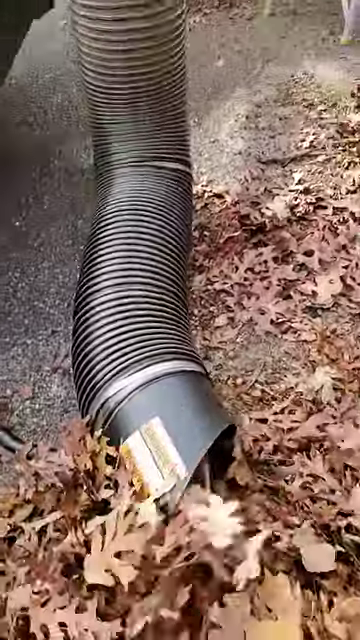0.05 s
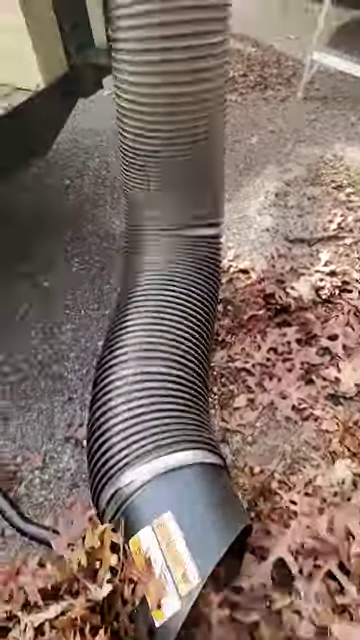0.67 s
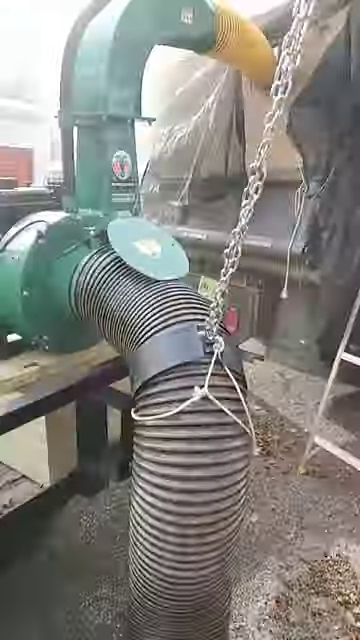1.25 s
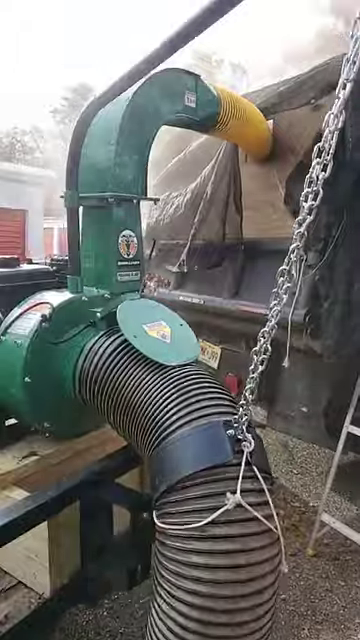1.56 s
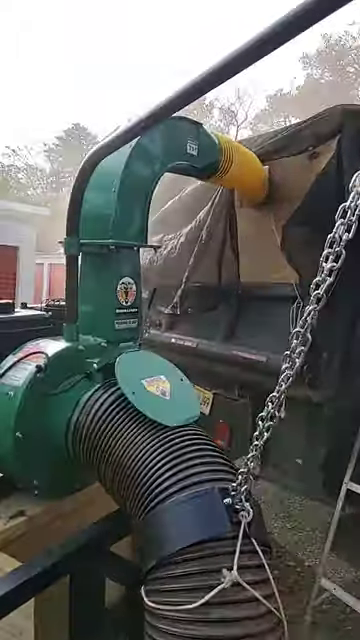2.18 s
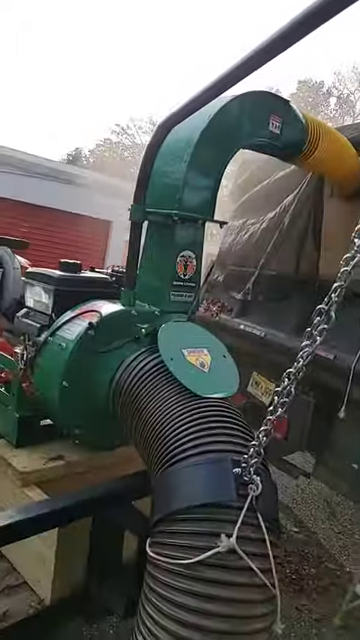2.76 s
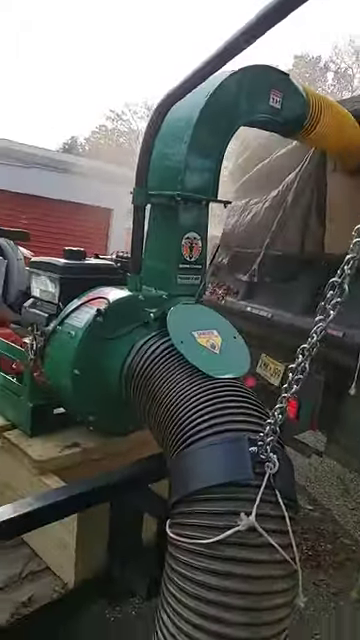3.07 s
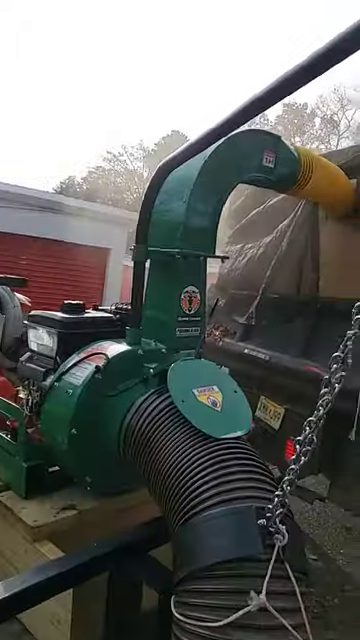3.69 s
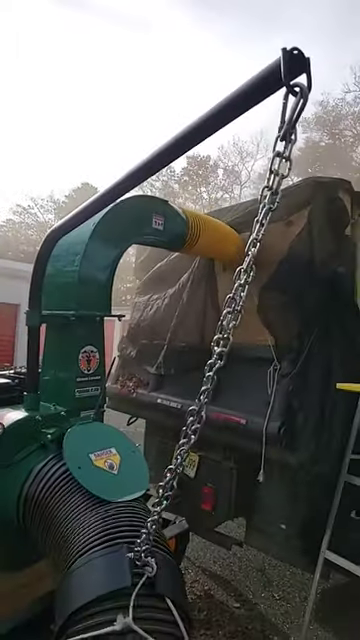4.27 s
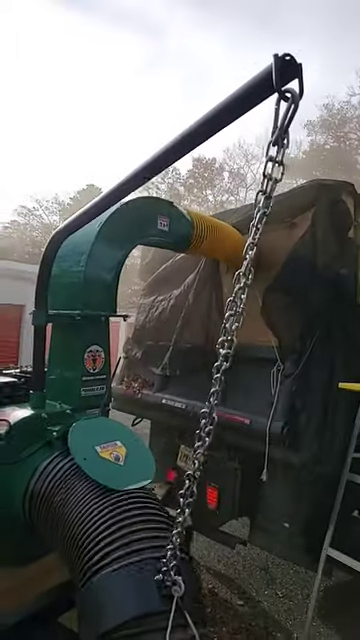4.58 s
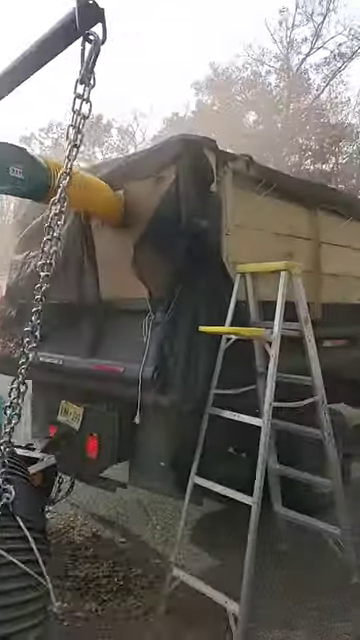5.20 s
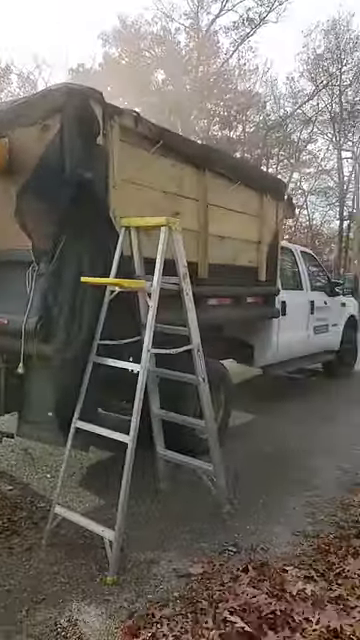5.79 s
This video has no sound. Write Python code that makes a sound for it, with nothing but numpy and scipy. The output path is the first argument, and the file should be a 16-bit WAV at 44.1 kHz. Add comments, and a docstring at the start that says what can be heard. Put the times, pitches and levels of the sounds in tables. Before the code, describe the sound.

An engine-driven leaf vacuum runs loudly outdoors for about six seconds, heard from a step or two away. Its fan holds a strong, low drone over a thumping, clattering engine and rumbling air. Leaves crackle constantly through the steel housing, and twigs and grit clack against it irregularly. At first dry leaves also rustle into the humming hose mouth, fading by about 1.5 seconds as the microphone moves along. At 1.2 seconds a big wad crunches through with a slight metallic ring; the pitch sags and recovers by about 2 seconds. Beside the machine the drone grows buzzier, with sharper clacks near 1.8 and 2.8 seconds. Between 4 and 4.7 seconds the drone dips twice, and more leaves lower the pitch slightly. Another sharp clack comes near 5 seconds, and the rumble and engine clatter grow a little toward the end.

```python
"""A truck loader's four-blade impeller drones at blade rate as it vacuums dry leaves through a ribbed hose.
A governed four-stroke engine spins it, thumping and clattering over rushing air. Leaves crackle through
the steel housing, twigs and grit clack against it, and one big wad bogs the engine down.
The listener walks outdoors, a step or two away, from the hose mouth past the housing to the truck box."""
import sys
import numpy as np
from scipy import signal
from scipy.fft import rfft, irfft
from scipy.io import wavfile

SR = 44100
rng = np.random.default_rng(int(sys.argv[2]) if len(sys.argv) > 2 else 0)


def generate_wav(signal):
    """Clip the signal to [-1, 1] and save it as 16-bit WAV at the path in sys.argv[1]."""
    frames = np.transpose(np.atleast_2d(signal))
    scaled = np.clip(frames, -1, 1) * 32767
    pcm = np.round(scaled).astype(np.int16)
    wavfile.write(sys.argv[1], SR, pcm)


N = 257984
TIME = np.arange(N) / SR
SIDES = np.array([[1], [-1]])  # left, right


# blade drone along the walk: t/s, relative level/dB
DRONE_FADER = [(0, -10), (.35, -10.5), (1.25, -15), (1.6, -16), (1.92, -9.5), (2.5, -11), (3.6, -13),
               (5.85, -12)]
# brief dips in the drone: start/s, end/s, depth/dB
DRONE_DUCKS = [(0.352, 0.437, 7), (0.547, .72, 1.8), (1.313, 1.538, 5), (4.01, 4.364, 9),
               (4.488, 4.664, 5.5), (4.9, 5.22, 2)]

def impeller(turns, octave_db):
    """Four blades pass the housing's tongue: a strong drone and its octave, reaching the right first."""
    dips_db = sum(db * spell(start, end, attack_s=.12, release_s=.11) for start, end, db in DRONE_DUCKS)
    drone_db = curves(DRONE_FADER)[0] + 3.5 - dips_db
    pan_db = -3 - 9 * bell(4.27, width_s=.055)  # the left side passes through a quiet spot
    blade_phase = 2 * np.pi * 4 * turns
    lag_rad = np.interp(TIME, [0, 2.7], [.3, 1.05])
    drone = np.sin(blade_phase - SIDES * lag_rad / 2 + .1 * drift(40)) * undb(drone_db + .36 * drift(30))
    octave = np.sin(2 * blade_phase - SIDES * .12 + .066 * drift(25))
    octave *= undb(octave_db + 1 + .74 * drift(15))
    return drone * pan(pan_db) + octave * pan(-3.5)


# leaves drawn in, adding up where they overlap: start/s, end/s, drag on the shaft/Hz
LEAF_FEEDS = [(-1, 1.2, .95), (.62, 1.2, .55), (4.26, 6, 1.0), (4.28, 4.55, 2.2), (4.79, 4.97, 1.4)]
FREE_SHAFT_HZ, GOVERNOR_LAG_S = 59.02, .29
WAD_START_S, WAD_END_S, WAD_DRAG_HZ = 1.218, 1.375, 9.3

def shaft_sag():
    """Turns per second lost to the leaves; flywheel and governor follow the drag with a lag."""
    feeds = sum(hz * spell(start, end, attack_s=.051, release_s=.051) for start, end, hz in LEAF_FEEDS)
    drag = feeds + WAD_DRAG_HZ * wad_passing()
    keep = np.exp(-1 / (GOVERNOR_LAG_S * SR))
    return drag[0] + signal.lfilter([1 - keep], [1, -keep], drag - drag[0])


def wad_passing():
    """How much of the big wad of leaves is among the blades, 0-1."""
    return spell(WAD_START_S, WAD_END_S, attack_s=.05023, release_s=.09)


# engine tones, with halves from firing every second turn: multiple of shaft speed, relative level/dB
ENGINE_TONES = [(1, -24.5), (1.5, -33), (2, -18), (2.5, -18), (3, -15), (3.5, -17.5), (4.5, -23),
                (5, -21.5), (5.5, -36), (6, -22), (6.5, -27), (7.5, -31), (8.5, -22), (9, -31), (9.5, -52),
                (10, -19.5), (10.5, -34), (11, -22.5), (13, -25.5), (13.5, -38.5), (16, -28.5),
                (17.5, -31.5), (22, -39), (22.5, -33), (24, -36)]

def engine(turns, thump_db, overtone_db):
    """Each firing is a thump of uneven strength, smeared by the muffler; block and shroud add overtones."""
    firing_db = 2 * drift(29)
    tones = 0
    for multiple, db in ENGINE_TONES:
        layer_db = thump_db + 14 + firing_db if multiple < 7 else overtone_db + 13 + 2 * drift(1.47)
        if multiple == 2:  # this tone booms briefly
            layer_db += 10 * bell(5.52, width_s=.07)
        smear = .2 * (multiple - 4) ** 2  # the muffler delays each tone differently
        waver = (.28 + .0058 * multiple) * drift(22)  # uneven firing blurs the high tones most
        phase = 2 * np.pi * multiple * turns + smear + waver
        tones -= np.sin(phase - SIDES * .21) * undb(db + layer_db + 1.67 * drift(14))
    return tones * pan(-1.3)


# knock rhythm: place in the engine cycle/0-1, relative level/dB
VALVE_KNOCKS = [(.02, -15), (0.359, -21), (0.609, -21), (0.751, -22)]
# boxy clatter: f/Hz, relative level/dB
CLATTER_EQ = [(200, -3.5), (400, 2), (560, 0), (760, -3), (900, -8.5), (1150, -8.5), (1300, -11.5),
              (1600, -12.5), (3000, -16.5), (8000, -32.5)]

def valves(turns, clatter_db):
    """Valve gear and exhaust gas clatter in a pattern that repeats every second turn."""
    knocks = sum(undb(db) * np.exp(-((turns / 2 - place) % 1) / .085) for place, db in VALVE_KNOCKS)
    gate = unit(.42 + knocks * undb(3.9 * drift(60)))
    return colour(stereo_noise(.54) * gate, CLATTER_EQ) * undb(clatter_db + 1) * pan(-2)


# larger twigs hitting the housing: t/s, relative peak level/dB, t60/s
TWIG_HITS = [(0.096, -20.5, 0.089), (0.3565, -18, 0.051), (0.631, -22.5, 0.15), (0.7921, -22.5, 0.14),
             (0.823, -21.5, 0.18), (0.844, -20.5, 0.08), (0.9682, -21, 0.2), (1.2173, -13.5, 0.18),
             (1.257, -16, 0.079), (1.353, -14.5, 0.1), (1.4707, -15, 0.12), (1.515, -16, 0.089),
             (1.8068, -15, 0.067), (1.825, -13, 0.14), (1.9605, -17.5, 0.17), (2.3875, -17.5, 0.069),
             (2.7751, -22, 0.1), (2.8479, -10, 0.072), (3.091, -23, 0.25), (3.1308, -22, 0.093),
             (3.362, -21.5, 0.069), (3.685, -23, 0.14), (3.864, -20, 0.11), (4.0246, -19.5, 0.11),
             (4.384, -18, 0.24), (4.475, -16, 0.25), (4.859, -18, 0.13), (4.9656, -11.5, 0.052),
             (5.4615, -23.5, 0.58), (5.66, -18, 0.17)]
# midrange body of shredding and clacks: f/Hz, relative level/dB
SHRED_EQ = [(250, -5), (600, 2), (1000, -2.5), (1300, -1), (1700, -1.5), (2300, -3), (3500, -11.5),
            (8000, -9)]
GRIT_PER_S = 3

def debris(sag_hz, shred_db):
    """Leaves crackle all the time, more under load; twigs and grit crack and trail off in fragments."""
    crackle_db = -27.5 + 1.5 * np.log2(1 + sag_hz)
    fine = grains(per_s=900, spread_db=2, t60_s=.05)
    coarse = grains(per_s=70, spread_db=2, t60_s=.13)
    patter = unit(fine + .6 * coarse)
    wad = undb(-15) * wad_passing() * grains(per_s=900, spread_db=1.3, t60_s=.05)
    crack_power = (patter * undb(crackle_db)) ** 2 + wad ** 2
    clack_power = (patter * undb(shred_db)) ** 2 + (wad * undb(-6)) ** 2
    grit = [(s, -28.5, .1) for s in rng.uniform(0, N / SR, int(GRIT_PER_S * N / SR))]
    for s, db, t60_s in TWIG_HITS + grit:
        age = np.maximum(TIME - s, 0)
        blow = (TIME >= s) * undb(db + 1.47 - 60 * age / t60_s)
        crack_power += blow ** 2
        clack_power += (blow * undb(-6.5)) ** 2
    splinters = grains(per_s=8400, spread_db=-2.7, t60_s=.012)
    pelting = stereo_noise(.092) * np.sqrt(clack_power) * splinters
    crackle = leaf_crackle(np.sqrt(crack_power) * splinters)
    return crackle + colour(pelting, SHRED_EQ) + housing(pelting) * undb(-14.5) + wad_clang()


# crisp leaf crackle: f/Hz, relative level/dB
CRACKLE_EQ = [(600, -30), (1500, -13.5), (2600, 0), (3600, -4), (4400, 0.5), (5600, -4), (7000, -5),
              (8600, -14.5), (10000, -7), (11000, 0), (13500, -2), (15500, -0.5)]
# its stereo image: f/Hz, left minus right/dB
CRACKLE_IMAGE = [(1500, 0), (2400, -2.5), (3800, 1), (4500, 0), (5500, 2), (7000, -.5), (11000, 0),
                 (12500, 3), (13500, 5.5), (15500, 6.5)]
# its sizzle above about 10 kHz along the walk: t/s, relative level/dB
SIZZLE_FADER = [(0, -1), (.9, 3.5), (1.4, -3), (2.5, -2), (4, -2), (5, -2), (5.85, 1)]

def leaf_crackle(envelope):
    """Bright crackle of breaking leaves; its top octave depends on where the listener stands."""
    crackle = colour(stereo_noise(.027) * envelope, CRACKLE_EQ)
    spectrum = rfft(crackle) * response(CRACKLE_IMAGE) ** (SIDES / 2)
    sizzle = irfft(spectrum * response([(7000, -14), (10500, 2.5)]), N)
    return irfft(spectrum, N) + sizzle * (undb(curves(SIZZLE_FADER)[0]) - 1)


# ring of the steel housing: f/Hz, t60/s, relative level/dB
STEEL_MODES = [(1300, .12, -2), (1345, .08, -7), (2480, .03, -8), (3236, .04, -10), (4044, .04, -11),
               (4350, .03, -11)]

def housing(pelting):
    """The steel shell rings in its modes when pelted."""
    ring = 0
    for hz, t60_s, db in STEEL_MODES:
        pole = np.exp((2j * np.pi * hz - np.log(1000) / t60_s) / SR)
        ring += undb(db) * np.sqrt(1 - abs(pole) ** 2) * signal.lfilter([1], [1, -pole], pelting).imag
    return ring


def wad_clang():
    """The wad's first blow sets the housing's lowest mode ringing."""
    age = np.maximum(TIME - WAD_START_S, 0)
    return undb(-26) * np.sin(2 * np.pi * STEEL_MODES[0][0] * age) * np.exp(-age / .1)


def hose_mouth(turns):
    """Dry leaves rustle in and the hose hums on two engine tones; all fade as the listener turns away."""
    rustle_db = np.interp(TIME, [0, .85, 1.15, 1.7], [-32, -28.5, -31.5, -58])
    rustle_eq = [(1500, -17), (2400, -5), (2900, -2.5), (3500, -4), (5000, -11.5), (8000, -11)]
    rustle = colour(stereo_noise(.092) * grains(per_s=270, spread_db=2.5, t60_s=.16), rustle_eq)
    hum_db = np.interp(TIME, [.7, 1.2], [-32, -60])
    low_hum = np.sin(2 * np.pi * 7.5 * turns) * undb(2 * drift(4.4))
    high_hum = np.sin(2 * np.pi * 13 * turns) * undb(-9.5 + 2 * drift(2.4))
    return rustle * undb(rustle_db) + (low_hum + high_hum) * undb(hum_db)


# deep air rumble: f/Hz, relative level/dB
RUMBLE_EQ = [(20, -25), (38, -32), (55, 6), (85, 1), (115, 2), (150, -8.5), (300, -37)]
# the rumble along the walk: t/s, level/dB
RUMBLE_FADER = [(0, -29), (.9, -29), (1.5, -32), (2.1, -31), (3, -34), (4.3, -34), (4.8, -30.5),
                (5.4, -27.5), (5.85, -26)]
# dark bed of rushing air: f/Hz, relative level/dB
RUSH_EQ = [(70, -26.5), (130, -5.5), (200, 1), (300, -2.5), (450, -6), (700, -17.5), (1500, -36.5)]

def airflow():
    """Turbulent air rushes through the housing and rumbles most by the hose mouth and the truck box."""
    rumble = colour(stereo_noise(1), RUMBLE_EQ) * undb(curves(RUMBLE_FADER)[0] + drift(9.7))
    rush = colour(stereo_noise(.92), RUSH_EQ) * undb(-27.5 + drift(7.5))
    return (rumble + rush) * pan(-2.6)


def grains(per_s, spread_db, t60_s):
    """Envelope of fragments striking at random and dying away; a negative spread makes some softer."""
    strength = undb(spread_db * np.minimum(rng.exponential(size=N), 4))
    strike_power = (rng.random(N) < per_s / SR) * strength ** 2
    keep = np.exp(-2 * np.log(1000) / (t60_s * SR))
    return unit(np.sqrt(signal.lfilter([1], [1, -keep], strike_power)))


def stereo_noise(likeness):
    """Left and right noise with a shared part, 0-1, that reaches the left a little later."""
    shared = rng.standard_normal(N)
    staggered = np.array([np.roll(shared, 5), shared])
    return np.sqrt(likeness) * staggered + np.sqrt(1 - likeness) * rng.standard_normal((2, N))


def colour(x, eq):
    """Minimum-phase EQ; white noise keeps its power."""
    cepstrum = irfft(np.log(unit(response(eq))), N)
    cepstrum[1:N // 2] *= 2
    cepstrum[N // 2 + 1:] = 0
    return irfft(rfft(x) * np.exp(rfft(cepstrum)), N)


def response(eq):
    """Gain at each spectral bin from points of f/Hz, level/dB."""
    hz, db = np.transpose(eq)
    bin_hz = np.arange(N // 2 + 1) * SR / N
    return undb(np.interp(np.log(bin_hz + 1), np.log(hz), db))


def drift(per_s):
    """Random wobble of rms 1, changing per_s times a second."""
    steps = rng.standard_normal(4096)
    return unit(np.interp(TIME * per_s, np.arange(len(steps)), steps))


def spell(start_s, end_s, attack_s, release_s):
    """Envelope that rises from its start, holds at up to 1 and falls after its end."""
    rise = (TIME - start_s) / attack_s
    fall = 1 - (TIME - end_s) / release_s
    return np.clip(np.minimum(rise, fall), 0, 1)


def bell(s, width_s):
    """Smooth swell that reaches 1 at the given time."""
    return np.exp(-((TIME - s) / width_s) ** 2)


def curves(table):
    """Each column of a timed table, sample by sample."""
    s, *columns = np.transpose(table)
    return [np.interp(TIME, s, column) for column in columns]


def pan(db):
    """Left and right gains for a level difference; negative leans right."""
    return undb(SIDES * db / 2)


def undb(db):
    """Decibels to gain."""
    return 10 ** (np.asarray(db) / 20)


def unit(x):
    """Scale to rms 1."""
    return x / np.sqrt(np.mean(x ** 2))


# relative levels along the walk: t/s, blade octave/dB, engine thump/dB, valve clatter/dB, shredding/dB
MACHINE_FADERS = [(0, -57, -28.5, -30, -34.5), (.7, -45, -30.5, -31.5, -36),
                  (1.05, -30.5, -27.5, -28, -34.5), (1.6, -31, -28, -27, -29),
                  (2.3, -24, -25.5, -27.5, -30), (4.25, -23.5, -24.5, -28, -30.5),
                  (4.65, -29, -28, -26.5, -29.5), (5.3, -28.5, -25.5, -24, -29),
                  (5.85, -26.5, -25, -25, -33)]

def scene():
    """One shaft drives the engine and the impeller; air rushes through and leaves slow it."""
    sag_hz = shaft_sag()
    turns = np.cumsum(FREE_SHAFT_HZ - sag_hz) / SR
    octave_db, thump_db, clatter_db, shred_db = curves(MACHINE_FADERS)
    overtone_db = (octave_db + clatter_db) / 2  # overtones come through best beside the machine
    machine = impeller(turns, octave_db) + engine(turns, thump_db, overtone_db) + valves(turns, clatter_db)
    return machine + airflow() + debris(sag_hz, shred_db) + hose_mouth(turns)


def record(dry):
    """Clip at full scale, then cut the treble steeply above 15.55 kHz."""
    high_cut = signal.ellip(10, .2, 80, 15550, fs=SR, output="sos")
    return signal.sosfilt(high_cut, np.clip(dry, -1, 1))


dry = scene()
out = record(dry)
generate_wav(out)
```